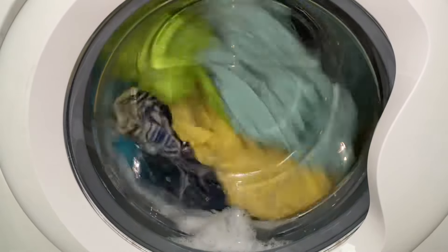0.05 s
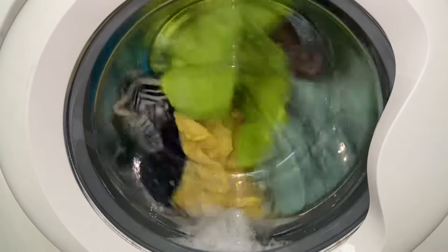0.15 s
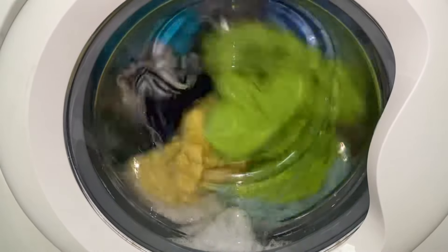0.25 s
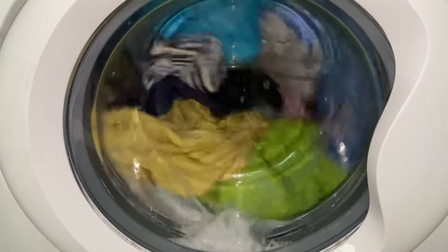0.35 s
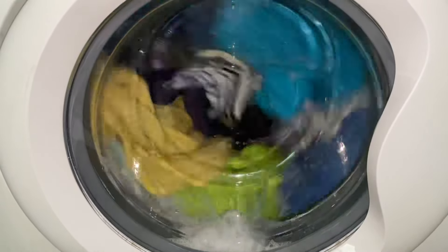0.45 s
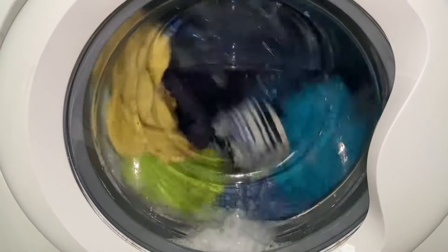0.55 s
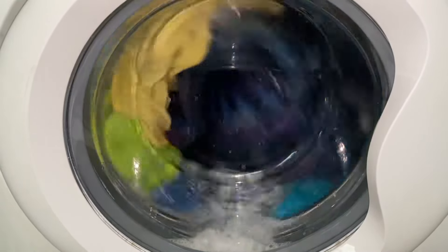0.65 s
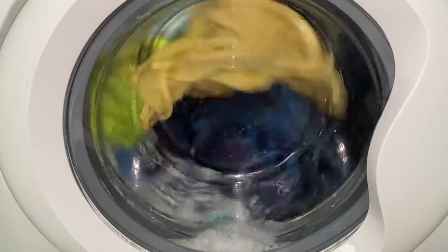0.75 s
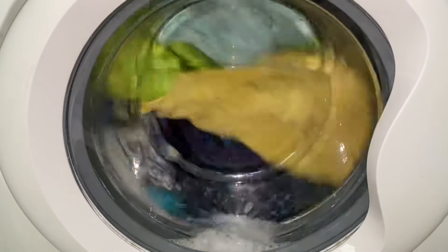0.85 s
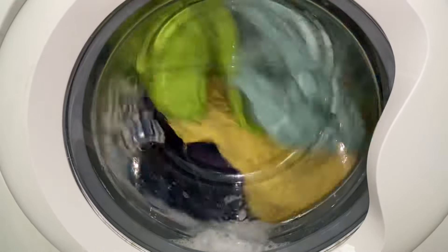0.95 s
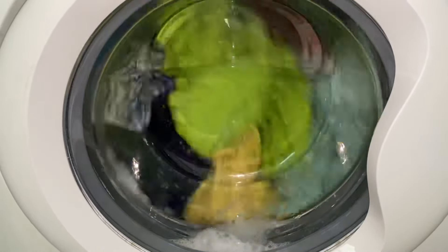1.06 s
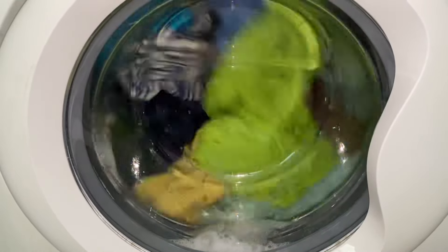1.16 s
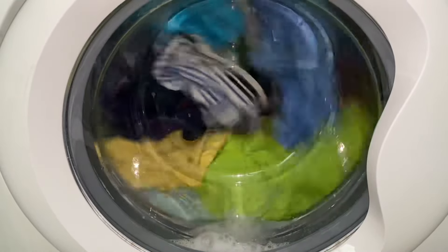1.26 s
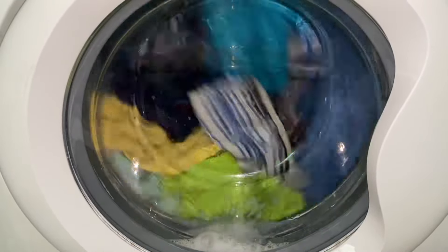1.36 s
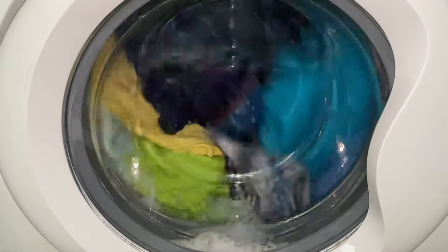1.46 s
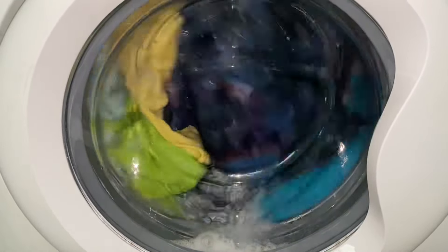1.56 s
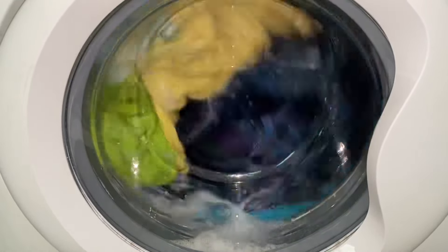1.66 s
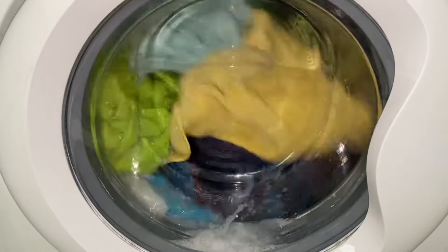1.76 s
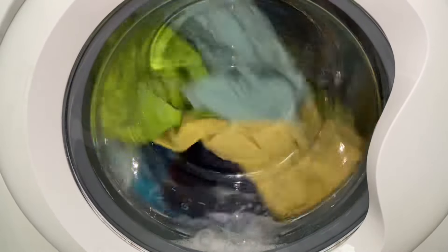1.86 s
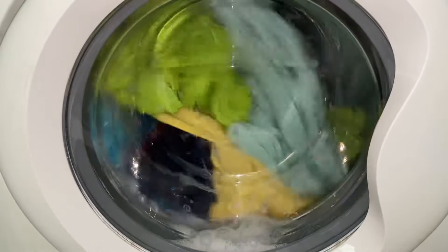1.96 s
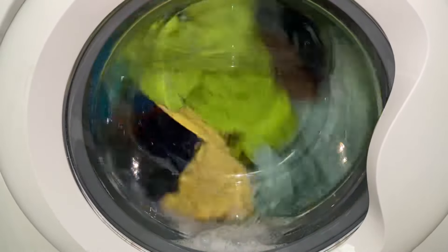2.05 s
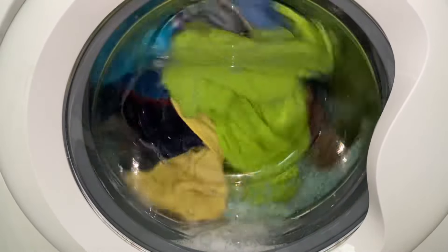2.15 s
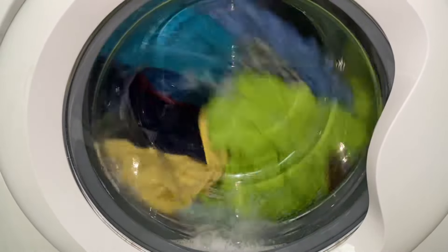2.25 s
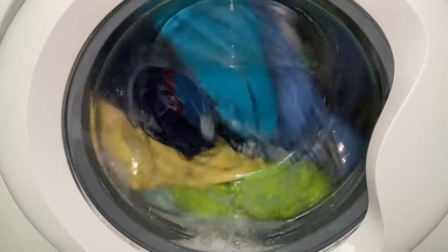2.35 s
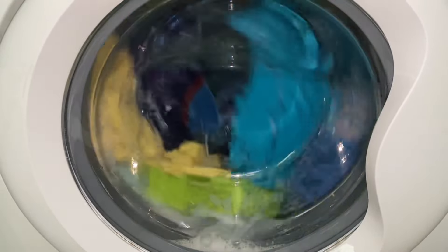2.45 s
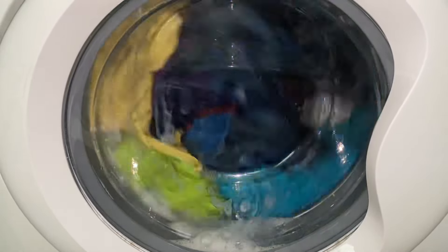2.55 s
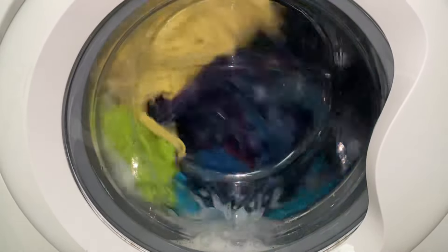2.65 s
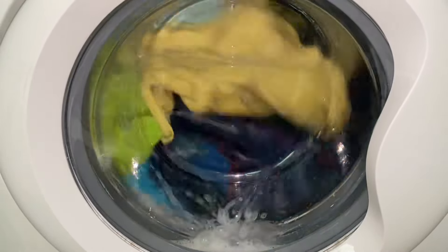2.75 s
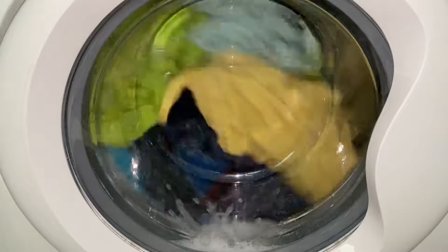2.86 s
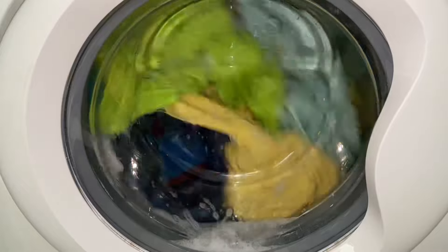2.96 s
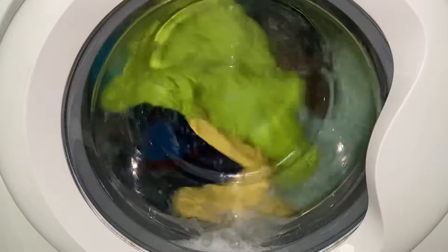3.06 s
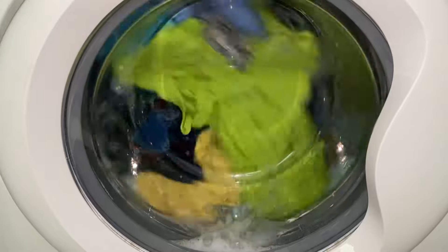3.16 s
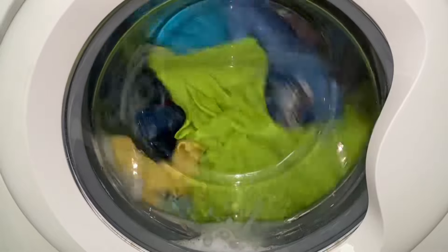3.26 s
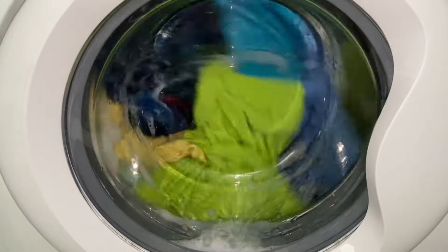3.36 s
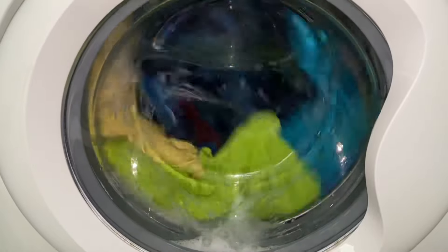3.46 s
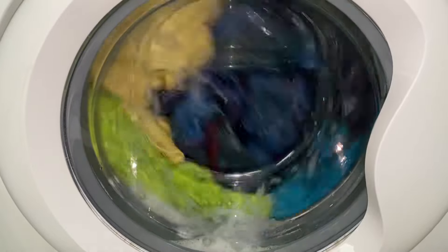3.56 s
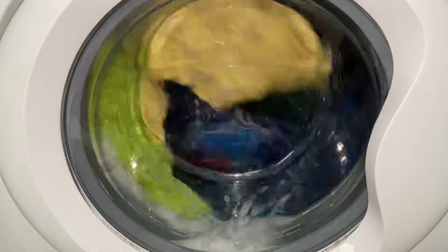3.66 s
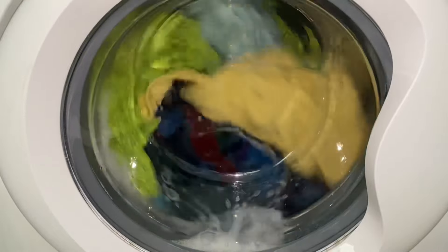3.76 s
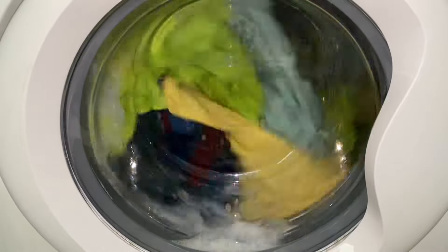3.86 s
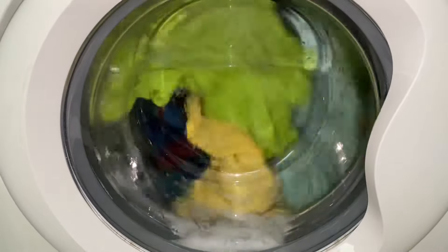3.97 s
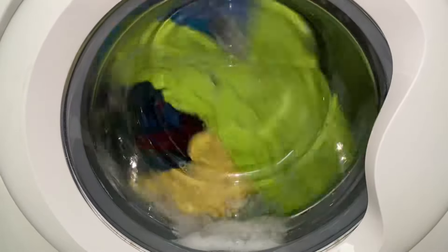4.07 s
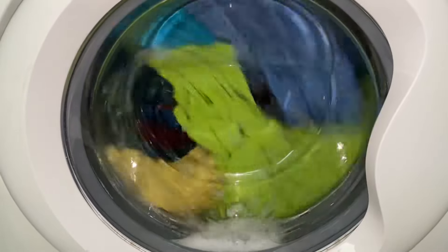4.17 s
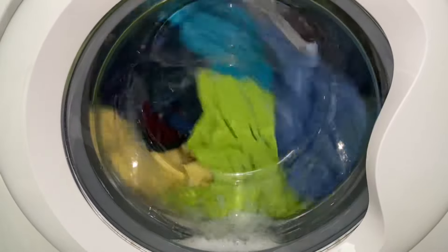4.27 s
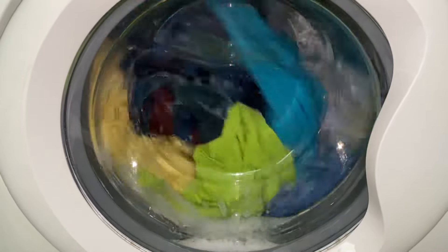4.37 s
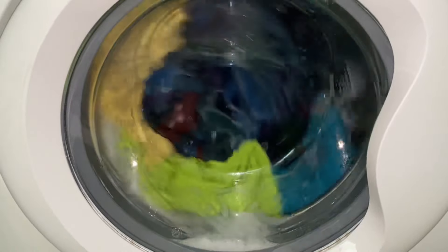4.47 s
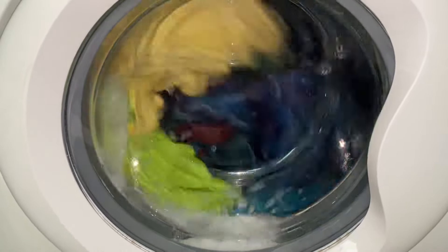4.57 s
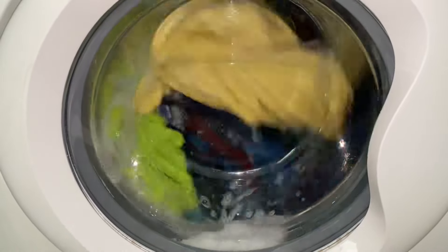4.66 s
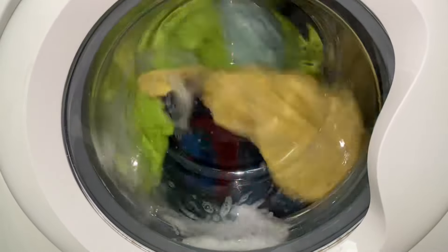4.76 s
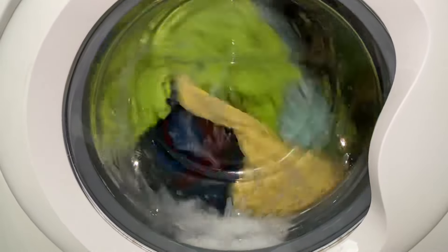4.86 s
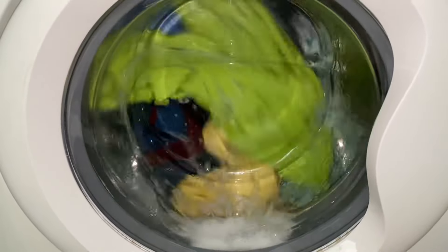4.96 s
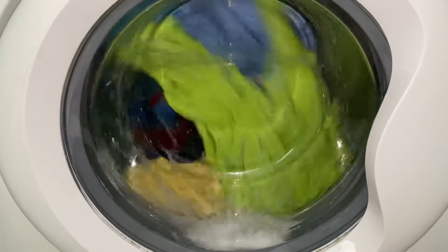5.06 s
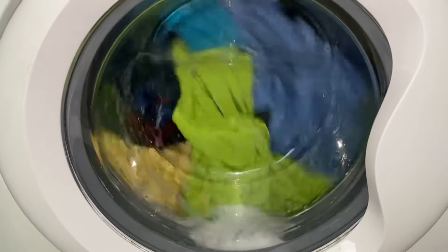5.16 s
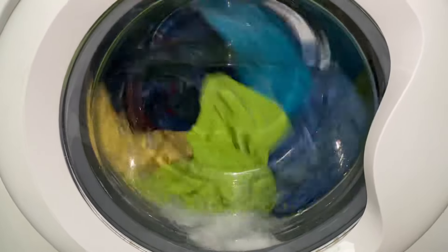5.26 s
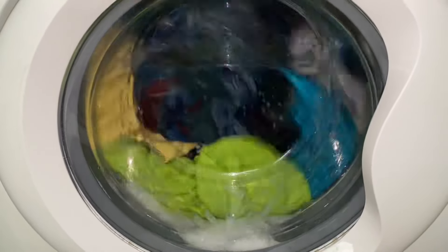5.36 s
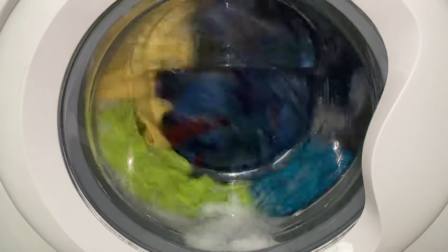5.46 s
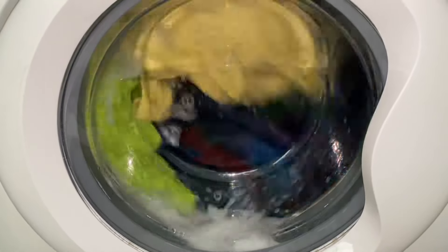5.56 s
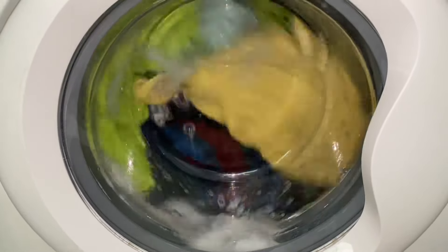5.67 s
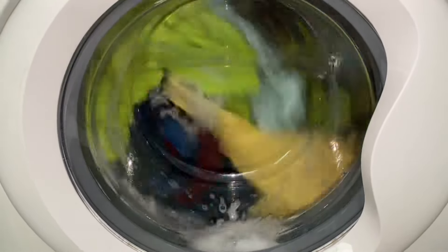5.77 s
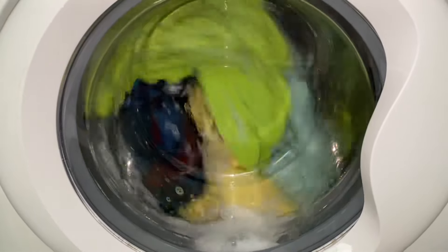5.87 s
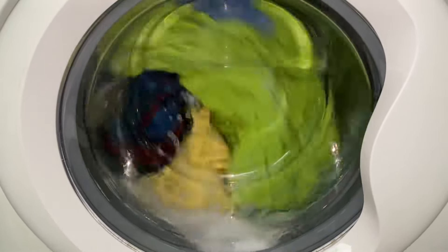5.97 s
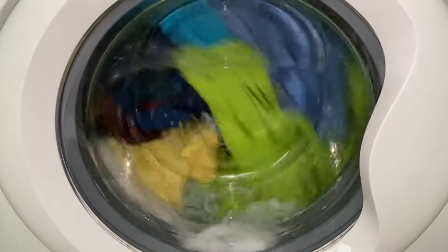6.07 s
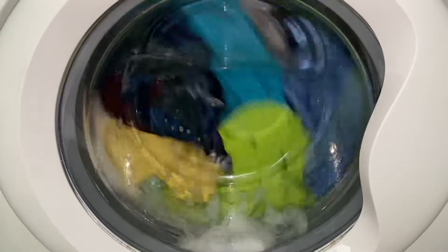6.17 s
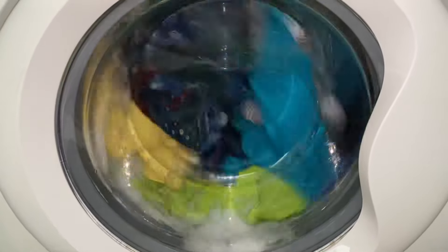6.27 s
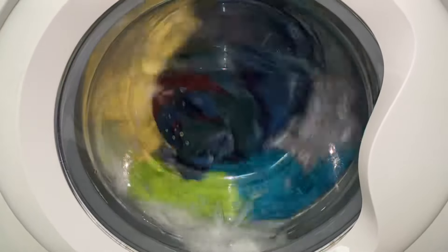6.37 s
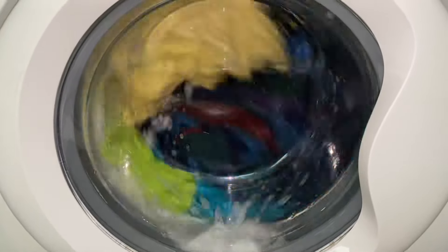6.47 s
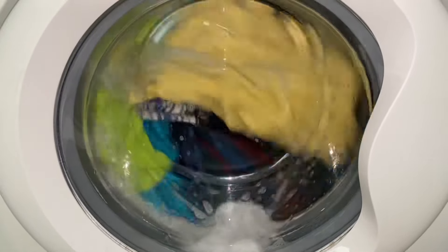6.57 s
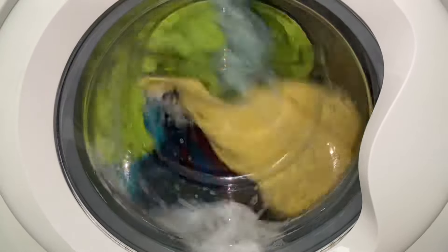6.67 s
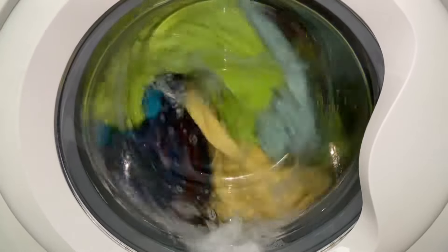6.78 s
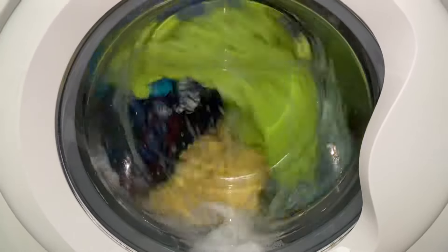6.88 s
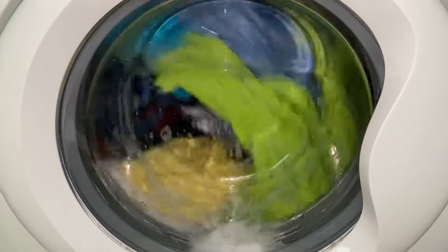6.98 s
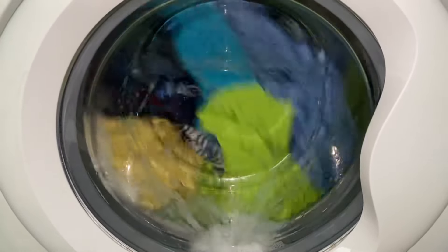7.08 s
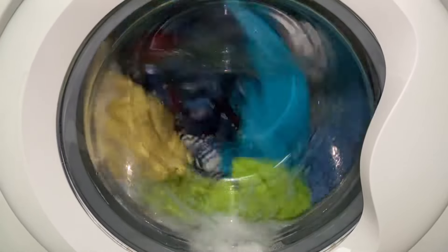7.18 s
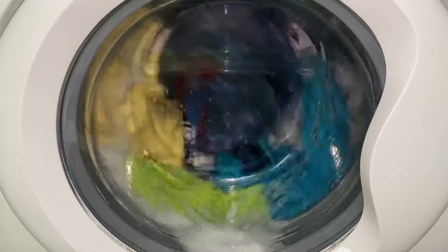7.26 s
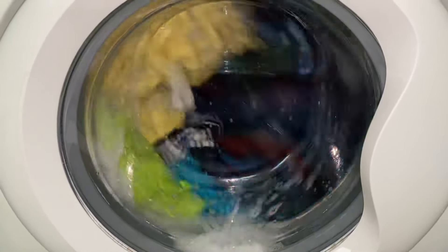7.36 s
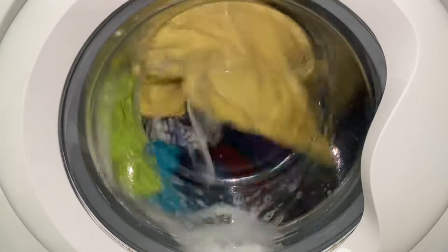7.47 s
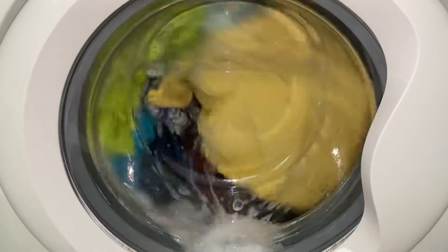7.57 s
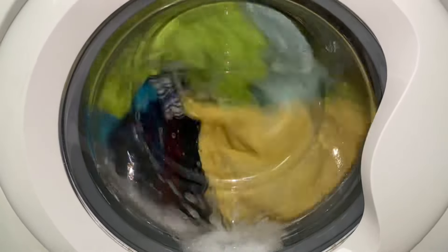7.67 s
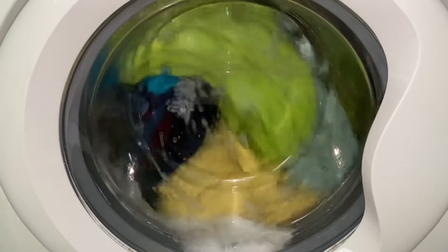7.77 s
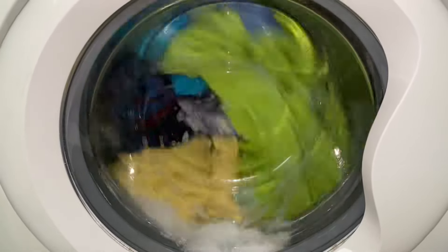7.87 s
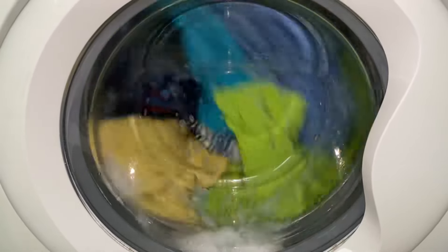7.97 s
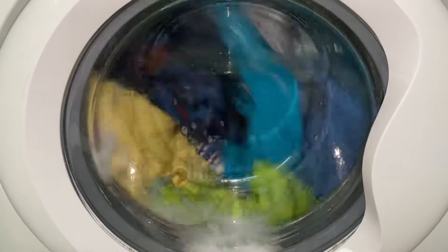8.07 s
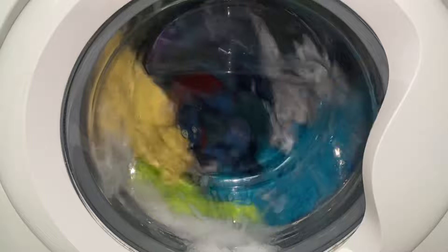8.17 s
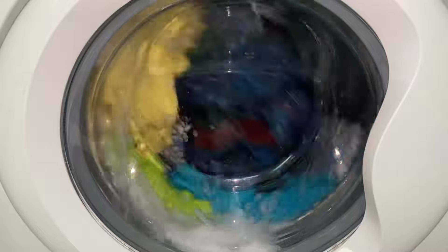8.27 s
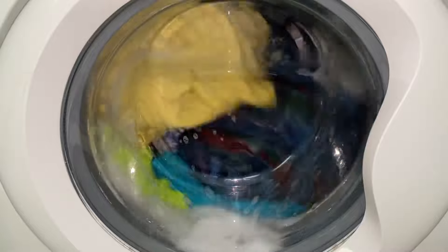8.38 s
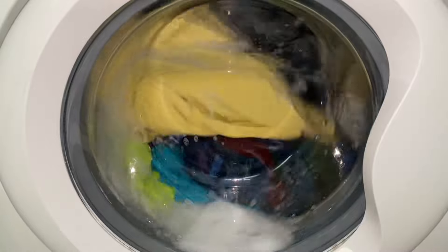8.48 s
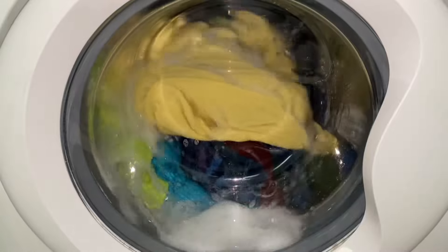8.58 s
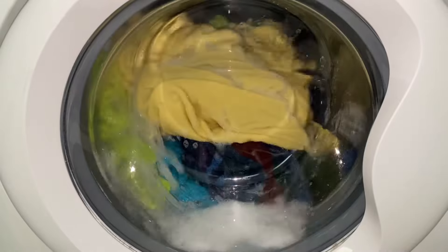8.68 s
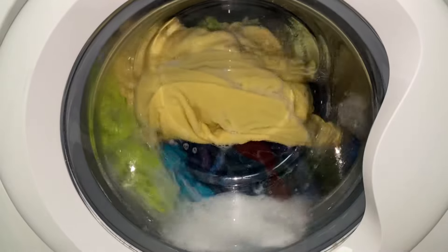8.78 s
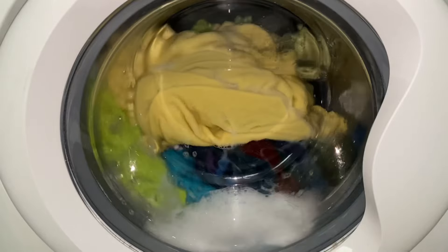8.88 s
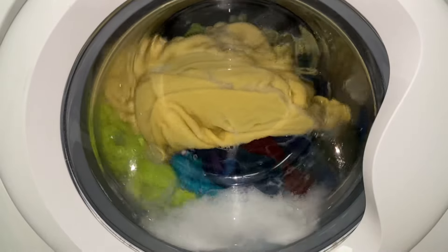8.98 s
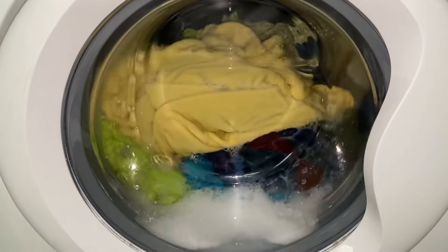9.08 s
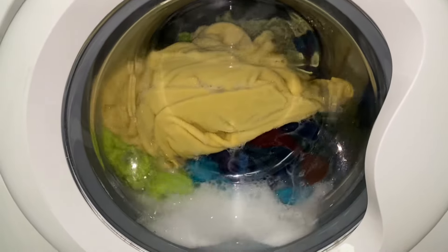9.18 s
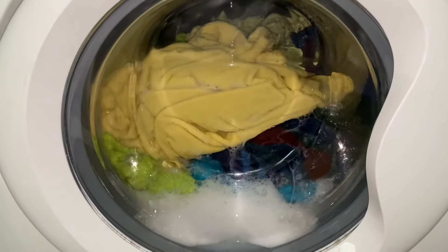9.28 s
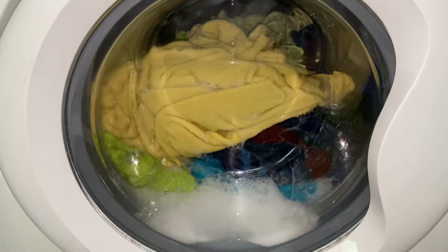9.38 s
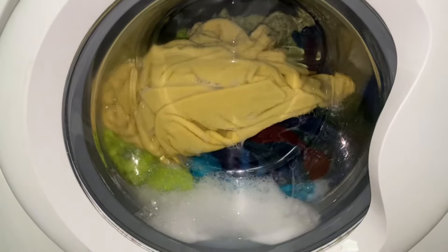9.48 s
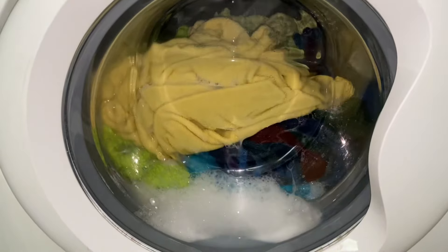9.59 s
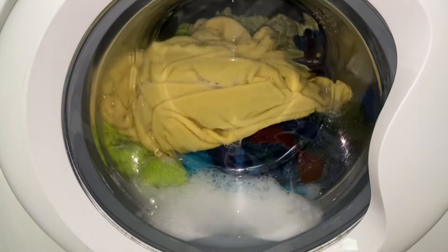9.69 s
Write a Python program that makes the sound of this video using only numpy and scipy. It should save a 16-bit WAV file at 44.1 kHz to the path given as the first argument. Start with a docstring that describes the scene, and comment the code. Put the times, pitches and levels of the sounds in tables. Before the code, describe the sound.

Close stereo pickup of a washing machine at home. Its motor hums steadily, a faint high belt chirp repeats rapidly, and suds surge and gurgle around the turning drum. Heavy wet cloth flops and thuds irregularly, spray spatters the glass, and buttons tick on steel. Near the end the hum stops, the laundry slumps, foam fizzes faintly, then tiny high squeaks and dull clicks are left in the quiet.

```python
"""A motor's hum and buzz come first, with belt chirps and sloshing suds: a front-loading washer tumbles wet laundry.
Close to its door in a small room, clothes slap, air gulps, and buttons knock on the steel drum.
Steady waves make the hum, shaped noise makes brushes, water and cloth, and fading rings make bubbles and metal.
At 8.1 s the motor cuts out: the load drops, the water settles, rubber squeaks and the machine clicks."""
import sys
import numpy as np
from scipy import signal
from scipy.fft import rfft, irfft, next_fast_len
from scipy.io import wavfile
from scipy.ndimage import uniform_filter1d, map_coordinates

SR = 44100
rng = np.random.default_rng(int(sys.argv[2]) if len(sys.argv) > 2 else 0)


def to_wav(s):
    """Save 16-bit WAV."""
    ch = np.atleast_2d(s).T  # columns
    pcm = np.round(np.clip(ch, -1, 1) * 32767)  # PCM
    wavfile.write(sys.argv[1], SR, pcm.astype(np.int16))


N = 429093
TIME = np.arange(N) / SR  # seconds
CUT_S = 8.12  # the motor cuts out


def amp(db):
    """Turn decibels into a gain."""
    return 10 ** (np.asarray(db) / 20)


def unit(x):
    """Scale to an rms of 1."""
    return x / np.sqrt(np.mean(x ** 2) + 1e-20)


def along(points, hz):
    """Read a (pitch, value) table at any pitch, on a log pitch axis."""
    point_hz, value = np.transpose(points)
    return np.interp(np.log(hz + 1), np.log(point_hz + 1), value)


def curves(rows):
    """Draw a line through each column after the time, with one value per sample."""
    s, *columns = np.transpose(rows)
    return [np.interp(TIME, s, column) for column in columns]


def wobble(rate):
    """A smooth random curve around zero, with `rate` random points a second."""
    points = rng.standard_normal(int(N * rate / SR) + 4)
    return map_coordinates(points, [TIME * rate])


def filtered(x, response):
    """Multiply the spectrum of x by a response that depends on pitch."""
    size = next_fast_len(N + SR // 4)
    hz = np.fft.rfftfreq(size, 1 / SR)
    return irfft(rfft(x, size) * response(hz), size)[..., :N]


# How alike the left and right sides are: pitch_hz, coherence [0 to 1]
LIKENESS = [(120, .985), (200, .975), (300, .84), (500, .3), (1000, .43), (1600, .55), (3000, .38),
            (5500, .38), (7000, .97)]


def coloured(pair, spectrum):
    """Give two unrelated white signals a spectrum, then spread them over left and right at the same power."""
    def response(hz):
        gain = unit(amp(along(spectrum, hz)))
        turn = np.arccos(np.clip(along(LIKENESS, hz), -1, 1)) / 2
        return gain * np.array([np.cos(turn), np.sin(turn)])

    mid, side = filtered(pair, response)
    return np.array([mid + side, mid - side])


def white():
    """Two unrelated white noises."""
    return rng.standard_normal((2, N))


def narrow(centre_hz, width):
    """Noise of rms 1 in one resonance, `width` Hz wide."""
    edges_hz = [centre_hz - width / 2, centre_hz + width / 2]
    band = signal.butter(2, edges_hz, "bandpass", fs=SR, output="sos")
    return unit(signal.sosfilt(band, rng.standard_normal(N)))


def whistle(centre_hz, waver):
    """A tone of rms 1 with an unsteady pitch; waver is a share of the pitch."""
    hz = centre_hz * (1 + waver * wobble(600))
    return np.sqrt(2) * np.sin(2 * np.pi * np.cumsum(hz) / SR)


def add(track, s, sound):
    """Mix a sound into a track at s seconds."""
    start = max(round(s * SR), 0)
    part = track[..., start:start + sound.shape[-1]]
    part += sound[..., :part.shape[-1]]


def bursts(rows, attack):
    """Loudness of blows (start_s, level_db, t60_s) that rise over `attack` seconds and die away by 60 dB in t60_s."""
    power, t = np.zeros(N), TIME[:SR // 2]
    for s, db, t60 in rows:
        blow = amp(db - 60 * t / t60) * (1 - np.exp(-t / attack))
        add(power, s, blow ** 2)
    return np.sqrt(power)


def swells(rows, rise):
    """Loudness of swells (crest_s, level_db, length_s); rise is the share of the length before the crest."""
    power = np.zeros(N)
    t = np.arange(-SR // 2, SR // 2) / SR
    for s, db, length in rows:
        u = t / (length * np.where(t < 0, rise, 1 - rise))
        swell = amp(db) * np.exp(-2 * u ** 2)
        before_start = max(round((.5 - s) * SR), 0)  # samples that would fall before time zero
        add(power, s - .5, (swell ** 2)[before_start:])
    return np.sqrt(power)


def settling(db_per_s):
    """Gain that holds while the motor runs and then dies away."""
    return amp(-db_per_s * np.maximum(TIME - CUT_S, 0))


# How long the room rings before it has faded by 60 dB: pitch_hz, t60_s
ROOM_FADE = [(200, 0.19), (2000, 0.16), (12000, 0.13)]


def room(x, wet_db):
    """Add the short answer of hard walls: a noise tail that fades at its own pace for each pitch."""
    hz, t, z = signal.stft(rng.standard_normal((2, SR // 3)), SR, nperseg=256)
    fade = amp(-60 * t / along(ROOM_FADE, hz)[:, None])
    tail = signal.istft(z * fade, SR, nperseg=256)[1]
    wet = signal.fftconvolve(x[None], tail / np.linalg.norm(tail[0]), axes=1)[:, :N]
    flat = [(1, 0)]
    return x + amp(wet_db) * coloured(wet, flat)


HUM_HZ = 99.96  # twice the mains rate
FADE_S = 0.12  # the motor current dies away after the cut
FLUTTER_DB, FLUTTER_PER_S = 1.5, 9  # the lowest line wavers at random
# Motor effort against the load, before small level trims: time_s, first_line_db, second_line_db
MOTOR_EFFORT = [(0.2, -41.5, -41), (0.53, -43.5, -40.5), (0.99, -49, -44), (1.36, -42, -41),
                (1.64, -55.5, -45), (2.43, -37.5, -38.5), (2.76, -44, -41), (3.35, -45.5, -42),
                (5.3, -44.5, -42), (6.3, -44, -41), (7.72, -43, -42), (7.9, -58, -43), (8.05, -43.5, -43)]
# Motor buzz through the cabinet, before it wavers: multiple of the hum pitch, level_db
CABINET_BUZZ = [(7, -66), (13, -70), (15, -69), (16, -69), (17, -70), (20, -72), (23, -72), (24, -74),
                (28, -75), (31, -71.5), (32, -71), (35, -72.5), (36, -74), (37, -76)]


def motor():
    """Magnetic pull at twice the mains rate: three strong low lines follow the effort, with a thin cabinet buzz."""
    steady_db, second_db = curves(MOTOR_EFFORT)
    first_db = steady_db + FLUTTER_DB * wobble(FLUTTER_PER_S)
    power = np.clip(1 - (TIME - CUT_S) / FADE_S, 0, 1)
    phase = 2 * np.pi * HUM_HZ * TIME
    hum = amp(first_db - 1.5) * np.cos(phase + 0.41 * wobble(8.5))
    hum += amp(second_db + 0.35) * np.cos(2 * phase + 0.15 * wobble(5.5))
    third_db = second_db - 6.5 + 1.47 * wobble(9)
    hum += amp(third_db) * np.cos(3 * phase + 0.51 * wobble(11.0))
    drift = 0.021 * wobble(7.3)
    buzz = np.zeros((2, N))
    for multiple, db in CABINET_BUZZ:
        # each line gets its own phase on the left and on the right
        offset = rng.uniform(0, 2 * np.pi) + 0.97 * rng.standard_normal((2, 1))
        buzz += amp(db) * np.cos(multiple * (phase + drift) + offset)
    buzz *= amp(3.56 * wobble(7.4))
    return np.sqrt(2) * power * (hum + buzz)


# Pulley speed: time_s, turns_per_s
PULLEY_TURNS = [(0, 11.71), (.8, 11.05), (1.6, 10.86), (2.4, 9.85), (3.2, 11.61), (4, 10.67), (4.8, 10.5),
                (5.6, 10.8), (6.4, 10.8), (7.2, 11.05), (8.1, 10.56), (8.45, 7), (8.66, 0)]


def pulley_speed():
    """Speed of the drive as a share of its fastest."""
    speed, = curves(PULLEY_TURNS)
    return speed / speed.max()


# The chirp starts weaker and builds up; its level also follows the square of the speed
BELT_DB, BELT_START_DB, BELT_BUILD_S = -61, -10.5, 2.3
# Hiss of the brushes: pitch_hz, relative level_db per Hz
BRUSH_SPECTRUM = [(500, 13), (1500, -7.5), (2000, 12), (2900, -0.5), (3200, 9.5), (4200, 5), (5300, 2.5),
                  (6500, -0.5), (10000, 0), (12000, 5), (13300, 4), (14000, -8), (15800, -12)]


def drive():
    """Brushes hiss with speed; the belt chirps once a turn, and more faintly twice a turn."""
    speed, = curves(PULLEY_TURNS)
    angle = 2 * np.pi * (np.cumsum(speed) / SR - .23)
    hiss_db = -57.5 + 1.13 * wobble(11) + 1.95 * wobble(60)
    hiss = amp(hiss_db) * pulley_speed() * coloured(white(), BRUSH_SPECTRUM)
    rub = unit(np.exp(5 * (np.cos(angle) - 1)) + .4) * amp(2.5 * wobble(150))
    graze = unit(np.exp(3 * np.cos(2 * angle - 2.8))) * amp(2.2 * wobble(17))
    squeal = 0.69 * whistle(11730, waver=0.01274) + 0.49 * whistle(11270, waver=0.018)
    belt_db = BELT_DB + BELT_START_DB * np.exp(-TIME / BELT_BUILD_S)
    belt = amp(belt_db) * (speed / np.median(speed)) ** 2
    return hiss + belt * (rub * squeal + 0.35 * graze * whistle(10050, waver=0.019))


CHURN_DB, CHURN_SWING_DB = -48, 1.5  # water stirred at full drum speed between surges
RIPPLE_DB, RIPPLE_DB_PER_S = -51.5, 21.5  # water rocking by itself, and how fast it settles
SURGE_RISE = 0.44  # share of a surge spent rising
# Surges as the three paddles plough laundry through the suds: crest_s, level_db, length_s
PADDLE_SURGES = [(.18, -47, 0.19), (.43, -45.5, .11), (.87, -44.5, .1), (1.11, -44, 0.26),
                 (1.32, -44, 0.046), (1.43, -43.5, 0.068), (1.81, -44, 0.082), (2.09, -43, 0.14),
                 (2.23, -44.5, 0.11), (2.5, -42, 0.1), (2.77, -45, 0.16), (3.05, -45, 0.15),
                 (3.47, -47, 0.19), (3.75, -46, 0.18), (4.2, -44.5, 0.13), (4.43, -44, 0.23),
                 (4.64, -43.5, 0.13), (4.97, -48.5, .07), (5.19, -43, 0.12), (5.42, -45.5, .11),
                 (6.15, -43.5, 0.2), (6.39, -40, 0.062), (6.56, -43.5, 0.094), (6.72, -46, 0.21),
                 (6.88, -44.5, 0.11), (7.08, -43.5, 0.13), (7.19, -44, 0.13), (7.32, -43, 0.12),
                 (7.44, -44.5, 0.1), (8.01, -46, 0.084), (8.12, -43, .16)]


def slosh_level():
    """Level of the water in dB: churn that follows the drum speed, surges, and ripples that outlast them."""
    churn = pulley_speed() * amp(CHURN_DB + CHURN_SWING_DB * wobble(14))
    ripple = amp(RIPPLE_DB) * settling(RIPPLE_DB_PER_S)
    surge = swells(PADDLE_SURGES, SURGE_RISE)
    return 10 * np.log10(churn ** 2 + ripple ** 2 + surge ** 2)


def patchy(depth_db):
    """Two white noises with patches of random gain, some hundred Hz wide and some tens of ms long."""
    z = signal.stft(white(), nperseg=512)[2]
    field = rng.standard_normal(z.shape[1:])
    field = uniform_filter1d(field, size=5, axis=0)  # smooth over pitch
    field = uniform_filter1d(field, size=7, axis=1)  # smooth over time
    return signal.istft(z * amp(depth_db * unit(field)), nperseg=512)[1][:, :N]


CRACKLE_PER_S, CRACKLE_SHARE = 1100, .35  # snaps a second on each channel; their share of the power


def crackle():
    """Two white noises, partly broken up into the tiny snaps of bursting water films."""
    snaps = unit(white() * (rng.uniform(size=(2, N)) < CRACKLE_PER_S / SR))
    return np.sqrt(CRACKLE_SHARE) * snaps + np.sqrt(1 - CRACKLE_SHARE) * unit(patchy(depth_db=2.5))


def bubbles(count, centre_hz, spread, cycles, scatter_db):
    """Small air pockets ring briefly and rise in pitch, each at its own place."""
    when, place = rng.uniform(size=(2, count, 1))  # place runs from one side to the other
    hz = np.clip(centre_hz * np.exp(spread * rng.standard_normal((count, 1))), 300, 6000)
    size = amp(scatter_db * np.minimum(rng.exponential(size=(count, 1)), 3))
    size = size * (centre_hz / hz) ** 0.57  # low bubbles are louder
    t = TIME[:900]
    age = hz * t / cycles
    envelope = size * np.exp(-3 * age) * (1 - np.exp(-25 * age))
    ring = envelope * np.sin(2 * np.pi * hz * t * (1 + 0.064 * age))
    index = ((when * N).astype(int) + np.arange(len(t))).ravel()
    sides = []
    for side in (place, 1 - place):
        panned = ring * np.sin(side * np.pi / 2)
        sides.append(np.bincount(index, panned.ravel(), N)[:N])  # add up all the rings
    return unit(np.array(sides))


# Churning suds: pitch_hz, relative level_db per Hz
WATER_SPECTRUM = [(150, -13), (330, -1), (440, -11), (530, 2), (600, -1), (675, 1.5), (800, -2.5),
                  (1050, -6.5), (1400, -13.5), (1600, -10), (1850, -20.5), (2600, -18), (4500, -30),
                  (15000, -37.5)]
# Fizzing foam: pitch_hz, relative level_db per Hz
FOAM_SPECTRUM = [(400, 10), (2300, -2), (5300, 6.5), (6300, 1), (12000, 2.5), (16000, -25)]


def water():
    """Suds churn and crackle in swells, full of bubbles and droplets; foam fizzes on after the drum has stopped."""
    slosh_db = slosh_level()
    clumps = unit(crackle() * amp(1.2 * wobble(40)))
    churn = coloured(clumps * amp(slosh_db - 1.17), WATER_SPECTRUM)
    bubble_db = 0.93 * slosh_db - 15.0  # bubbles fade more slowly than the churn as the water settles
    gurgle = amp(bubble_db) * bubbles(count=1100, centre_hz=783.0, spread=0.379, cycles=19.5, scatter_db=1.0)
    droplets = amp(slosh_db - 24.5) * bubbles(count=260, centre_hz=2420, spread=0.335, cycles=38, scatter_db=3.5)
    wash = churn + gurgle + droplets
    deep = filtered(wash, lambda hz: 1 / (1 + (hz / 1000) ** 4))
    vigour = amp(0.74 * np.minimum(slosh_db + 57.0, 3))  # gentle water loses its splashy top
    fizz_db = np.interp(TIME, [8.5, 9.05, 9.4], [-77, -77, -91]) + 1.3 * wobble(230)
    foam = coloured(white() * amp(fizz_db), FOAM_SPECTRUM)
    return deep + vigour * (wash - deep) + foam


def drum_wall():
    """The steel drum sings in two modes under the moving water and rings on after each slap."""
    slap_push = bursts([(s, db - 14, .22) for s, db in CLOTH_SLAPS], attack=0.0073)
    force = np.hypot(amp(slosh_level() - 9.5), slap_push)
    return force * (0.44 * narrow(527.8, width=24.0) + 0.87 * narrow(664.4, width=34))


SWAY_DB, SWAY_DB_PER_S = -55, 12  # the tub on its springs, and how fast it comes to rest
RUMBLE_DB, RUMBLE_DB_PER_S = -46.5, 22  # laundry rolling in the drum, and how fast it comes to rest
LURCH_RUMBLE_DB = 1  # rumble of a lurch relative to its sway
PUSH_DB = 1  # rumble of the shifting water relative to its surge
# A heavy bundle rolls over and the tub lurches: crest_s, level_db, length_s
TUB_LURCHES = [(1.61, -49, 0.14), (2.27, -49, .25), (2.6, -50, 0.32), (2.95, -50, 0.45), (3.69, -48, 0.21),
               (4.72, -47, 0.34), (6.17, -45, 0.18), (6.68, -48, 0.2), (8.17, -47, 0.49),
               (8.43, -47.5, 0.3), (8.85, -59.5, .16), (9.67, -64.5, 0.075)]
# The load dropping in the tub: start_s, level_db before the soft attack, upper modes relative level_db
LOAD_DROPS = [(2.204, -30, -16), (2.484, -40, 2), (3.69, -40.5, 7.5), (6.372, -33, 2), (8.108, -29, -10)]
# Swaying tub: pitch_hz, relative level_db per Hz
SWAY_SPECTRUM = [(28, -46), (45, 2), (65, 1.5), (85, -18), (120, 0.5), (300, -105)]
# Rolling laundry, also used for the thud of cloth: pitch_hz, relative level_db per Hz
RUMBLE_SPECTRUM = [(50, -37), (80, -6), (97, 5), (120, 1), (146, -10.5), (185, 4.5), (225, -5), (280, -2),
                   (340, -8), (430, -13.5), (700, -53)]


def tub():
    """The tumbling load sways the tub, rumbles in the drum and now and then drops onto three low tub modes."""
    lurch = swells(TUB_LURCHES, rise=0.45)
    sway = np.hypot(amp(SWAY_DB) * settling(SWAY_DB_PER_S), lurch) * coloured(white(), SWAY_SPECTRUM)
    rolling = amp(RUMBLE_DB) * settling(RUMBLE_DB_PER_S)
    push = amp(PUSH_DB) * swells(PADDLE_SURGES, SURGE_RISE)
    rumble_gain = np.sqrt(rolling ** 2 + push ** 2 + (amp(LURCH_RUMBLE_DB) * lurch) ** 2)
    rumble = rumble_gain * coloured(white(), RUMBLE_SPECTRUM)
    thump, t = np.zeros(N), TIME[:SR // 3]
    for s, db, upper_db in LOAD_DROPS:
        upper = np.sin(2 * np.pi * 172 * t) + 0.58 * np.sin(2 * np.pi * 265 * t)
        ring = np.sin(2 * np.pi * 88 * t) + amp(upper_db) * upper
        add(thump, s, amp(db - 60 * t / 0.21) * (1 - np.exp(-t / 0.0099)) * ring)
    return sway + rumble + thump


# Wet clothes landing, before each layer's level trim: start_s, level_db
CLOTH_SLAPS = [(0.04, -40), (2.023, -34.5), (2.483, -32.5), (3.162, -34), (3.322, -36), (3.429, -34),
               (3.687, -37.5), (4.039, -35.5), (4.36, -35), (4.735, -35.5), (5.041, -33.5), (5.062, -33),
               (5.13, -35.5), (5.569, -36), (5.995, -35.5), (6.365, -30.5), (6.52, -34), (7.063, -34),
               (7.158, -32.5), (8.107, -32.5)]
# Spray thrown against the glass: start_s, level_db before it spatters, t60_s
GLASS_SPRAYS = [(0.04, -51, 0.14), (0.42, -50, 0.18), (1.34, -43.5, 0.1), (3.335, -48.5, 0.21),
                (4.39, -45, 0.18), (5.038, -42, 0.05), (5.21, -49.5, 0.32), (5.605, -49, 0.42),
                (6.366, -43, 0.08), (8.398, -45, 0.094), (8.53, -47.5, 0.095), (8.672, -50.5, 0.23)]
# Wet cloth on steel: pitch_hz, relative level_db per Hz
SLAP_SPECTRUM = [(200, -12), (330, -2), (500, 0), (680, 1), (1050, -3), (1600, -10), (2000, -17),
                 (4000, -28), (15000, -46)]
# Spray on glass: pitch_hz, relative level_db per Hz
SPRAY_SPECTRUM = [(300, 3), (1200, 9), (3000, -0.5), (5500, -5), (8000, -1), (12000, -6), (16000, -21)]


def laundry():
    """Wet cloth lands with a spattering slap and a dull thud, and flings spray at the glass."""
    slap = bursts([(s - .002, db - 2.2, .13) for s, db in CLOTH_SLAPS], attack=.0016)
    thud = bursts([(s, db - 0.5, .14) for s, db in CLOTH_SLAPS], attack=0.0044)
    spatter = unit(amp(0.79 * wobble(350)))
    spray = spatter * bursts(GLASS_SPRAYS, attack=0.00036)
    slap_sound = coloured(crackle() * slap, SLAP_SPECTRUM)
    thud_sound = coloured(white() * thud, RUMBLE_SPECTRUM)
    return slap_sound + thud_sound + coloured(white() * spray, SPRAY_SPECTRUM)


GULP_CYCLES = 26  # cycles, at the starting pitch, until a gulp has faded by 60 dB
# Air pockets gulping under the laundry: start_s, level_db before attack and room, starting pitch_hz
AIR_GULPS = [(0.042, -30, 990), (1.11, -31.5, 894), (2.026, -32, 616), (2.481, -34, 490), (3.688, -28, 624),
             (5.041, -27, 598), (5.061, -33, 405), (6.364, -34, 1160), (7.219, -35, 667), (8.672, -48, 333),
             (8.748, -49, 600)]


def gulps():
    """Cloth traps a large pocket of air under water; it rings briefly and rises a little in pitch."""
    out, t = np.zeros(N), TIME[:SR // 4]
    for s, db, hz in AIR_GULPS:
        age = hz * t / GULP_CYCLES
        envelope = amp(db - 60 * age) * (1 - np.exp(-hz * t))
        add(out, s, envelope * np.sin(2 * np.pi * hz * t * (1 + 0.029 * age)))
    return room(out, wet_db=-2.0)


STEEL_T60_S, FAVOUR_OCTAVES = 0.035, 0.091  # how long the modes ring; how narrowly a contact picks among them
# Buttons and zips knocking on wet steel: start_s, level_db before attack and room, favoured pitch_hz
STEEL_KNOCKS = [(.219, -41, 2790), (3.161, -32.5, 3030), (3.162, -38, 1590), (3.427, -49, 5430),
                (4.862, -41, 2790), (4.884, -34, 1590), (5.039, -46, 5430), (5.21, -37, 2230),
                (5.292, -41, 2790), (5.298, -33, 2530), (6.114, -35.5, 1590), (7.7, -33, 1590),
                (8.087, -36.5, 2750), (8.106, -31, 1590), (8.403, -44, 2790), (8.406, -39, 1590),
                (8.454, -34.5, 1570)]
# Modes of the drum's shell: pitch_hz
SHELL_MODES = [1582, 2297, 2760, 3216, 5360]


def buttons():
    """Each knock clacks and rings the steel shell, most of all the modes that its place of contact favours."""
    out, t = np.zeros(N), TIME[:SR // 4]
    for s, db, favoured_hz in STEEL_KNOCKS:
        ring = np.zeros(len(t))
        for hz in SHELL_MODES:
            distance = np.log2(hz / favoured_hz) / FAVOUR_OCTAVES
            ring += np.sin(2 * np.pi * (hz * t + rng.uniform())) / np.hypot(1, distance)
        band = signal.butter(2, [favoured_hz / 2, favoured_hz * np.sqrt(2)], "bandpass", fs=SR)
        clack = unit(signal.lfilter(*band, rng.standard_normal(len(t)))) * amp(-5 - 60 * t / .03)
        attack = 1 - np.exp(-t / 0.0029)
        add(out, s, amp(db) * attack * (ring * amp(-60 * t / STEEL_T60_S) + clack))
    return room(out, wet_db=-8)


# Rubber sticking and slipping as the drum settles, before the room:
# start_s, length_s, pitch_hz, level_db, octave-below relative level_db, rasp relative level_db
RUBBER_SQUEAKS = [(8.477, 0.019, 11450, -52, -40, -20), (8.531, 0.044, 11330, -53.5, -10.5, -1),
                  (9.207, 0.053, 11100, -67, -40, -28), (9.418, 0.059, 11280, -46.5, -12, -5),
                  (9.651, 0.026, 11440, -50, -11, -23), (9.716, 0.029, 11200, -44, -27, -31)]


def rubber():
    """Stick-slip squeaks hold a nearly level pitch, with some rasp and a growing octave below."""
    out = np.zeros(N)
    waver = wobble(500)
    rasp = 1.1 * narrow(8750, width=220) + 0.7 * narrow(9900, width=1000)
    for s, length, hz, db, sub_db, rasp_db in RUBBER_SQUEAKS:
        u = np.linspace(0, 1, int(length * SR))  # progress through the squeak
        start = rng.integers(N // 2)
        part = slice(start, start + len(u))
        pitch_hz = hz * (1 + 0.011 * (u - .5) + 0.011 * waver[part])
        phase = 2 * np.pi * np.cumsum(pitch_hz) / SR
        octave_below = amp(sub_db) * 2 * u * np.sin(phase / 2)
        tone = np.sin(phase) + octave_below + amp(rasp_db) * (1 - u) * rasp[part]
        add(out, s, amp(db) * np.sin(np.pi * u) * tone)
    return room(out, wet_db=2.5)


# Clicks of the resting machine, before the band filter and the room:
# start_s, ring level_db, rattle level_db, rattle t60_s, lower band edge_hz, upper band edge_hz
REST_CLICKS = [(9.032, -60, -48.5, 0.27, 398, 915), (9.276, -45, -51.5, 0.093, 100, 5000),
               (9.632, -56, -50.5, 0.28, 850, 1580)]
# Modes of the front panel: pitch_hz, relative level_db, t60_s
PANEL_MODES = [(213, 0, .08), (272, 4.5, 0.088), (404, -1, 0.11), (540, -9, .07), (672, -4.5, 0.092),
               (1076, -20, 0.1), (1410, -14, 0.061), (1510, -4, 0.05), (1860, -20, 0.16), (4075, -17, 0.11),
               (4280, -16, 0.099), (4480, -13, .09)]


def fittings():
    """Each click of the resting machine rings and rattles the front panel; loose contact roughens high modes most."""
    clicks, t = np.zeros(N), TIME[:SR // 4]
    unrest = wobble(330)

    def mode(hz):
        """One mode with a chattering phase; low ones take longest to build up."""
        start = rng.integers(N // 2)
        chatter = hz / 3300 * unrest[start:start + len(t)]
        return (1 - np.exp(-hz * t / 2)) * np.sin(2 * np.pi * (hz * t + rng.uniform()) + chatter)

    for s, ring_db, rattle_db, t60, low_edge_hz, high_edge_hz in REST_CLICKS:
        ring = sum(amp(db - 60 * t / life) * mode(hz) for hz, db, life in PANEL_MODES)
        rattle = rng.standard_normal(len(t)) * amp(rattle_db - 60 * t / t60)
        band = signal.butter(2, [low_edge_hz, high_edge_hz], "bandpass", fs=SR)
        add(clicks, s, signal.lfilter(*band, amp(ring_db) * ring + rattle))
    return room(clicks, wet_db=-3)


# Quiet of the room: pitch_hz, relative level_db per Hz
QUIET_SPECTRUM = [(20, -25), (50, -12), (110, -19), (250, -8), (600, -29), (1500, -24.5), (5000, -34),
                  (15000, -34)]


def scene():
    """The machine over the quiet of the room."""
    quiet = amp(-78.5) * coloured(white(), QUIET_SPECTRUM)
    running = motor() + drive() + water() + drum_wall() + tub()
    landing = laundry() + gulps() + buttons()
    resting = rubber() + fittings()
    return quiet + running + landing + resting


TOP_HZ = 15800  # nothing is kept from here up
# The left side is nearer the drum: pitch_hz, left minus right level_db
SIDE_LEAN = [(300, .3), (550, 3.2), (1100, 2.6), (1600, 2), (2400, 3.8), (5500, 3), (7000, 0)]
# Phase between left and right, turning steadily through the treble: pitch_hz, phase difference in turns
TREBLE_PHASE = [(7100, 0), (9000, .5), (11000, 1), (12000, 1.15), (13400, 1.5), (15000, 2)]


def record(dry):
    """Two sides that differ in level and treble phase, and a band limit."""
    sides = np.array([[.5], [-.5]])  # each side takes half of the difference

    def side_response(hz):
        level = amp(sides * along(SIDE_LEAN, hz))
        return level * np.exp(2j * np.pi * sides * along(TREBLE_PHASE, hz))

    stereo = filtered(dry, side_response)
    return filtered(stereo, lambda hz: hz < TOP_HZ)


dry = scene()
out = record(dry)
to_wav(out)
```